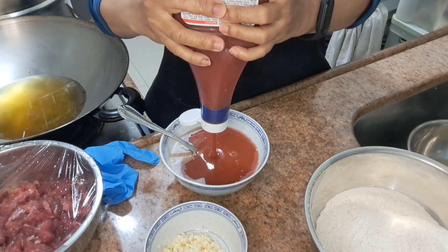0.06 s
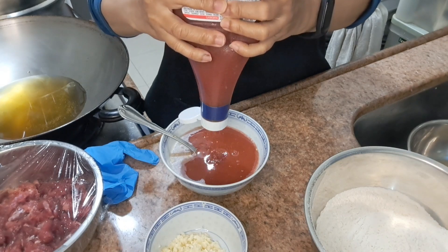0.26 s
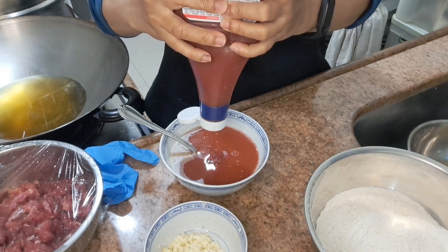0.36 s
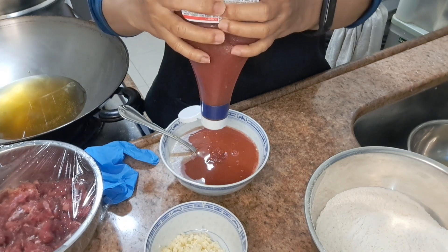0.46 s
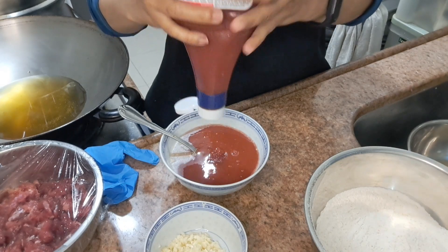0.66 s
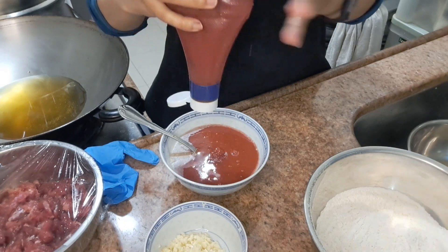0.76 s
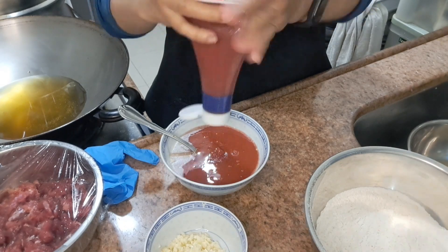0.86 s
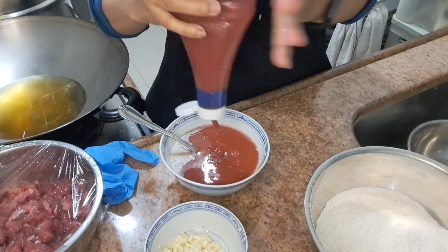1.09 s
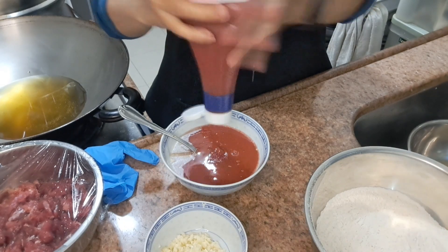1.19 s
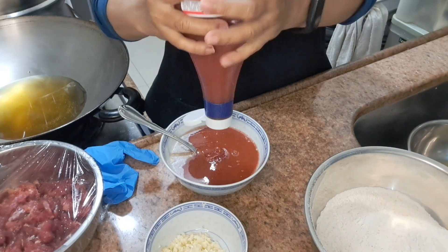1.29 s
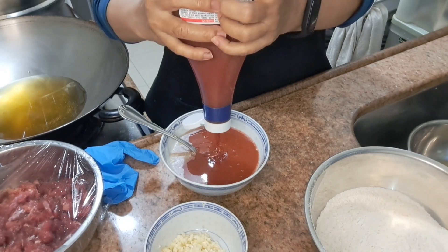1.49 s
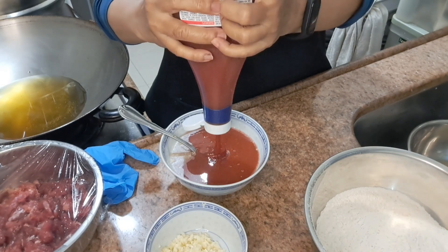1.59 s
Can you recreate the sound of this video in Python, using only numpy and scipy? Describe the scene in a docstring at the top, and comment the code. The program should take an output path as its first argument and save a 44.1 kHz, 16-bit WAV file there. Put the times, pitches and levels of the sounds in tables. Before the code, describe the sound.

A plastic squeeze bottle sputters thick sauce into a bowl in a quick run of wet pops and fizz. One sharp spit follows, then a dull thud as sauce drops into the neck, heard close in a small kitchen.

```python
"""A plastic squeeze bottle of thick sauce sputters upside down over a bowl in a small kitchen.
Air bursts through the sauce in the nozzle as wet pops with a fizzing spray. Then the bottle is jerked
down twice and the sauce drops into the neck: first with a sharp spit, then with only a dull thud.
Bottle and room ring briefly over a faint bed of rumble and hiss."""
import sys
import numpy as np
from scipy import signal
from scipy.fft import rfft, irfft
from scipy.io import wavfile
from scipy.ndimage import uniform_filter1d, minimum_filter1d

SR = 44100
rng = np.random.default_rng(int(sys.argv[2]) if len(sys.argv) > 2 else 0)


def inscribe(sig):
    """Save sig as 16-bit PCM at rate SR to the path in sys.argv[1].

    A 1-D sig is mono; a 2-D sig holds one channel per row.
    Samples are clipped to [-1, 1] before scaling.
    """
    pcm = np.round(np.clip(np.atleast_2d(sig).T, -1, 1) * 32767)
    wavfile.write(sys.argv[1], SR, pcm.astype(np.int16))


N = 72765
THUD_CYCLES = 0.53  # cycles a thud or a puff takes to swell


def pops():
    """Each air pocket bursts with a pop and a low puff; its tearing film rings the nozzle and spits."""
    # bursting air pockets (time [s], level [dB], pitch [Hz], snap and spit offset [dB])
    pockets = [(0.223, -10.5, 380, -1.5), (0.2329, -0.5, 444, 3), (0.245, -14.5, 570, 11.5),
               (.2532, -2.5, 477, 3), (.2595, -12.5, 505, 3), (0.2695, -1, 402, 3.5), (.2780, -20, 420, 3),
               (0.283, -8, 399.5, -3.5), (.2908, -7.5, 365, 0), (0.2967, -4.5, 370, -18),
               (.3092, -7.5, 380, -14), (0.327, -4.5, 345, -13.5), (.3440, -24, 380, 4),
               (0.3542, -8, 370, -8), (0.358, -15, 340, -11.5), (0.3649, -8.5, 348, -16),
               (.3800, -17, 330, -5), (0.3957, -14, 347, -13), (0.4845, -21, 368, -8.5),
               (.5040, -26.5, 628, 0.5), (0.5091, -17.5, 396.7, -1.5), (0.528, -16.5, 370, -2),
               (0.5383, -16, 300, -0.5), (0.544, -16.5, 356, 1.5), (0.548, -23, 278, -16),
               (0.5739, -40, 300, -31), (0.981, -13.5, 356, -22)]
    # resonances of nozzle and cap (frequency [Hz], gain [dB])
    nozzle_eq = [(250, -28), (520, -6), (740, 2), (950, -2), (1170, -1), (1400, 0.5), (1650, -11.5),
                 (2000, -19.5), (2500, -40), (3400, -24), (4500, -37.5), (9000, -56.5)]
    # narrow rings of the cap (frequency [Hz], width [Hz], gain [dB])
    cap_modes = [(1157.3, 22, 7), (1275, 29, -3), (719.6, 22, 2.5)]
    # tone of the spray each pop throws (frequency [Hz], relative level [dB])
    spit_eq = [(300, -18.5), (1000, -2.5), (2000, 3), (2600, -3.5), (3400, -2), (4500, -5.5), (6000, -2),
               (8000, -16.5), (16000, -29)]
    pitch_scatter = 0.0063
    puff_db, puff_hz = -25.5, 91.1
    snap_db, snap_delay_s = 23.5, 0.0012
    spit_db, spit_decay_s = -27, 0.0055
    body, snaps, spit_hits = np.zeros((3, N))
    for t, db, hz, offset_db in pockets:
        pitch = hz * (1 + pitch_scatter * rng.standard_normal())
        body += undb(db) * blip(t, pitch, cycles=0.74)
        body += undb(db + puff_db) * blip(t, puff_hz, THUD_CYCLES)
        tear = int((t + snap_delay_s) * SR)
        snaps[tear] += undb(db + offset_db + snap_db)
        spit_hits[tear] += undb(db + offset_db + spit_db)
    spit_envelope = signal.lfilter([1], [1, -np.exp(-1 / (spit_decay_s * SR))], spit_hits)
    spit = spit_envelope * unit(colour(crackle(), spit_eq))
    nozzle = colour(snaps, nozzle_eq)
    cap = sum(undb(db) * resonate(nozzle, hz, width) for hz, width, db in cap_modes)
    return body + nozzle + spit + cap


def thuds():
    """Sauce slides down the plastic wall and lands softly in the neck of the bottle."""
    # the slug of sauce landing (time [s], level [dB], pitch [Hz])
    landings = [(.533, -30.5, 101), (0.973, -22, 66), (0.993, -21, 115.4), (1.335, -19, 75),
                (1.339, -27, 200), (1.353, -16, 95), (1.364, -33, 240)]
    # sauce shifting along the wall (time [s], rise [s], hold [s], decay constant [s], level [dB])
    slides = [(.978, 0.006, 0.027, .02, -36), (1.332, 0.0053, 0.029, 0.01464, -34)]
    # dark tone of the slosh (frequency [Hz], relative level [dB])
    slosh_eq = [(60, -16), (170, 3), (380, -4), (560, -24), (1000, -26.5), (1500, -30), (2200, -39.5),
                (3500, -37.5), (5500, -49.5), (16000, -51)]
    slosh = envelope(slides) * unit(colour(crackle(), slosh_eq))
    return slosh + sum(undb(db) * blip(t, hz, THUD_CYCLES) for t, db, hz in landings)


def spray():
    """The nozzle throws broad spurts, and air leaking through gaps in the sauce adds a thin fizz."""
    # spurts of spray (time [s], rise [s], hold [s], decay constant [s], level [dB])
    spurts = [(.221, .03, 0.037, 0.032, -36.5), (.352, 0.006, 0.022, 0.035, -46),
              (.524, 0.02, 0.0025, .012, -47), (.605, 0.012, .012, .008, -62),
              (.9705, 0.0031, 0.012, 0.024, -32.5)]
    # bright tone of the spurts (frequency [Hz], relative level [dB])
    spray_eq = [(300, -10), (900, 0.5), (1500, 7), (2400, -8.5), (3400, 2), (4400, -4), (5800, -0.5),
                (7000, 0.5), (8200, -6.5), (9200, -7), (11500, -15), (16000, -19)]
    # air leaks (time [s], rise [s], hold [s], decay constant [s], level [dB], pitch [Hz])
    leaks = [(0., 0.00087, 0.009, 0.01, -64, 3600), (0.246, .001, .007, .005, -26, 3340),
             (0.266, .001, .008, .022, -32.5, 3540), (0.265, .001, 0.0066, .015, -39.5, 5720),
             (.354, .008, 0.0041, 0.0064, -45.5, 9600), (0.481, 0.0025, .035, 0.01, -54.5, 3480),
             (0.516, 0.012, .005, 0.01, -44, 1980), (0.529, .008, 0.0083, 0.014, -43, 6790),
             (0.609, 0.0071, 0.0055, 0.008, -50.5, 1490), (0.53, 0.0028, .006, 0.021, -41.5, 3344),
             (0.528, 0.0023, 0.003, 0.015, -40, 5980), (0.969, 0.0033, .012, .02, -43, 1733)]
    leak_q = 9.7  # of each of the two band-passes
    out = envelope(spurts) * unit(colour(crackle(), spray_eq))
    droplets = crackle()
    for *shape, hz in leaks:
        fizz = resonate(resonate(droplets, hz, hz / leak_q), hz, hz / leak_q)
        out += envelope([shape]) * unit(fizz)
    return out


def crackle():
    """Wet texture: tiny droplets tear off in an uneven stream of air."""
    drops_per_s, drop_spread_db, air_gain = 4400, 1.5, 0.5
    sputter_per_s, sputter_db = 220, 3.5
    drops = (rng.random(N) < drops_per_s / SR) * rng.standard_normal(N)
    drops *= undb(-drop_spread_db * rng.standard_normal(N))
    sputter = np.interp(since(0) * sputter_per_s, np.arange(N), rng.standard_normal(N))
    air = air_gain * rng.standard_normal(N)
    return unit((unit(drops) + air) * undb(sputter_db * sputter))


def hollow(x):
    """The bottle and the space round it ring on, low and hollow, after each push."""
    # hollow resonances (frequency [Hz], t60 [s], gain [dB])
    modes = [(64.6, 0.25, 10), (104.1, .22, 17.5), (206.7, 0.16, 10.5), (253.2, .2, 2.5), (330.4, 0.11, 9),
             (411.7, 0.38, -3), (446.4, 0.14, -4), (515, 0.17, 2.5), (563.3, 0.1, 6)]
    return sum(undb(db) * resonate(x, hz, np.log(1000) / np.pi / t60) for hz, t60, db in modes)


def kitchen(x):
    """Counter and walls throw back a short, dense echo."""
    # reverb bands (low edge [Hz], high edge [Hz], t60 [s], gain [dB])
    bands = [(130, 900, 0.19, -1), (900, 2500, 0.18, -5.5), (2500, 8800, .25, -5.5),
             (8000, 16000, .2, -13.5)]
    predelay_s = 0.0017
    t = since(predelay_s)[:SR // 2]
    response = np.zeros(len(t))
    for lo_hz, hi_hz, t60, db in bands:
        fade = (t > 0) * np.exp(-np.log(1000) * t / t60)
        bandpass = signal.butter(3, [lo_hz, hi_hz], "band", fs=SR, output="sos")
        noise = signal.sosfilt(bandpass, rng.standard_normal(len(t)))
        response += undb(db) * noise * fade / np.sqrt(np.sum(fade ** 2))
    return through(x, response)


def background():
    """Room tone: a faint kitchen rumble swells and sinks under a steady hiss."""
    # tone of the rumble (frequency [Hz], relative level [dB])
    rumble_eq = [(25, -16.5), (60, 10), (110, -3.5), (170, -9.5), (350, -9.5), (550, -17), (1000, -23),
                 (1600, -38), (3000, -57.5), (16000, -64)]
    # fader ride of the rumble (time [s], level [dB])
    rumble_ride = [(0, -60.5), (.2, -65), (.7, -53), (.92, -64), (1.25, -56), (1.65, -53.5)]
    # tone of the hiss (frequency [Hz], relative level [dB])
    hiss_eq = [(1000, -16.5), (3000, -8.5), (7000, -3), (11000, -5.5), (16000, -7.5)]
    hiss_db = -82.5
    rumble_db = np.interp(since(0), *np.array(rumble_ride).T)
    rumble = undb(rumble_db) * unit(colour(rng.standard_normal(N), rumble_eq))
    return rumble + undb(hiss_db) * unit(colour(rng.standard_normal(N), hiss_eq))


def blip(start, hz, cycles):
    """A heavily damped tone that swells for the given cycles and dies."""
    out = np.zeros(N)
    onset = int(start * SR)
    i = np.arange(onset + 1, min(onset + SR // 10, N))
    turns = (i / SR - start) * hz
    out[i] = (turns / cycles * np.exp(1 - turns / cycles)) ** 2 * np.sin(2 * np.pi * turns)
    return out


def envelope(events):
    """Sum of rise, hold and decay shapes, one for each event."""
    return sum(undb(db) * np.minimum(since(t) / rise, 1) ** 2 * np.exp(-since(t + rise + hold) / decay)
               for t, rise, hold, decay, db in events)


def colour(x, points):
    """Minimum-phase EQ through (frequency [Hz], gain [dB]) points."""
    hz, db = np.array(points, float).T
    f = np.maximum(np.fft.rfftfreq(8192, 1 / SR), 1)
    gain = undb(np.interp(np.log(f), np.log(hz), db))
    cepstrum = irfft(np.log(gain))
    cepstrum[1:] *= 2  # fold onto positive time, so nothing rings ahead of a hit
    cepstrum[len(f):] = 0
    return through(x, irfft(np.exp(rfft(cepstrum))))


def resonate(x, hz, width_hz):
    """Band-pass with gain 1 at the centre."""
    return signal.lfilter(*signal.iirpeak(hz, hz / width_hz, fs=SR), x)


def through(x, response):
    """Pass a sound through an impulse response."""
    return signal.fftconvolve(x, response)[:N]


def since(start):
    """Seconds since start, zero before it."""
    return np.maximum(np.arange(N) / SR - start, 0)


def undb(db):
    """Decibels to gain."""
    return 10 ** (np.asarray(db) / 20)


def unit(x):
    """Scale to rms 1."""
    return x / np.sqrt(np.mean(x ** 2))


def scene():
    """Mono mix of the bottle, its hollow ring, the kitchen echo and the room tone."""
    bottle = pops() + thuds() + spray()
    return (bottle + hollow(bottle) + kitchen(bottle) + background())[None]


def record(dry):
    """A fast limiter holds down the loudest peaks, and a steep low-pass trims the top."""
    ceiling, window_s, top_hz = 0.97, 0.004, 15900
    window = int(window_s * SR)
    needed_gain = ceiling / np.maximum(np.abs(dry), ceiling)
    gain = uniform_filter1d(minimum_filter1d(needed_gain, window), window)
    lowpass = signal.ellip(8, 0.2, 70, top_hz, fs=SR, output="sos")
    return signal.sosfilt(lowpass, dry * gain)


dry = scene()
out = record(dry)
inscribe(out)
```